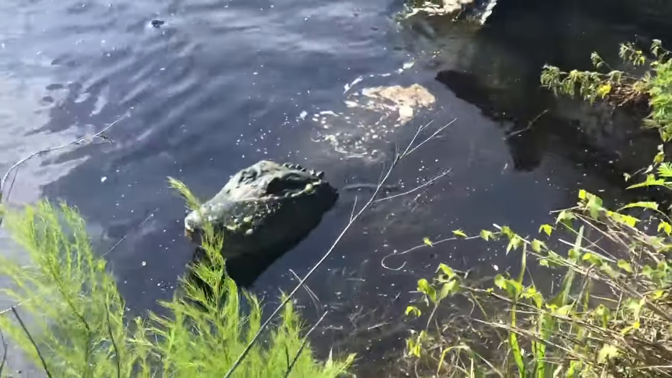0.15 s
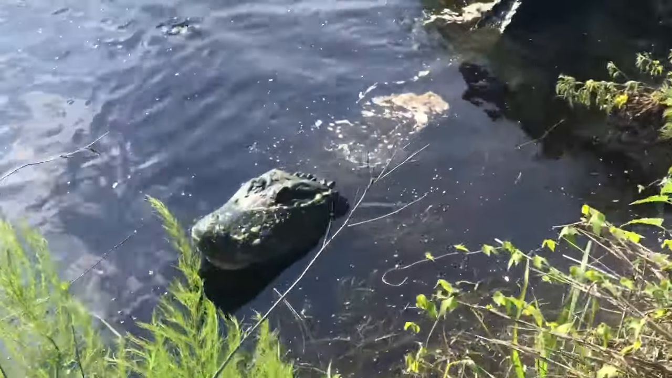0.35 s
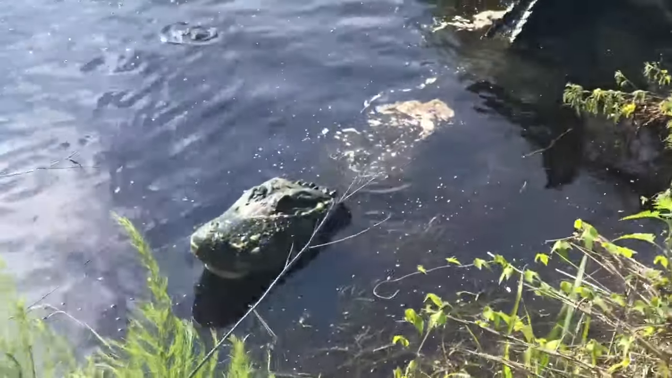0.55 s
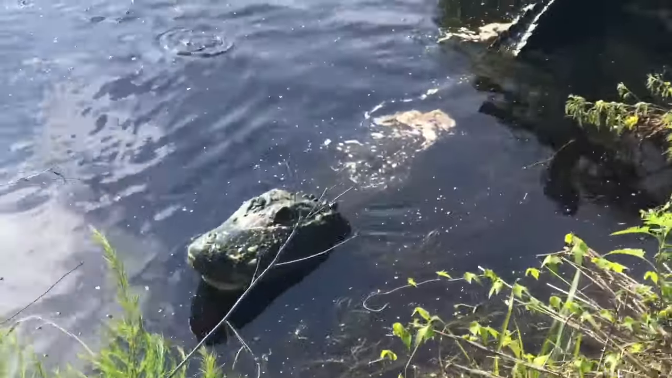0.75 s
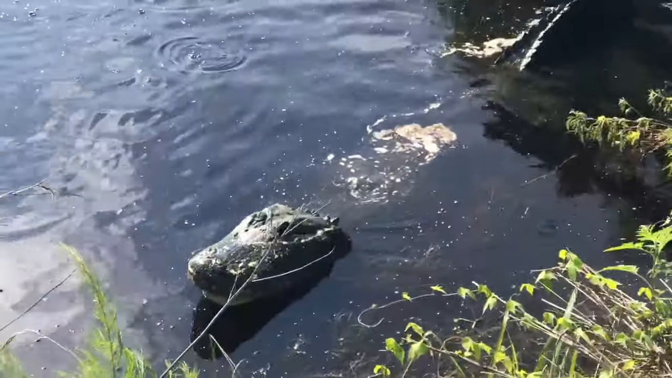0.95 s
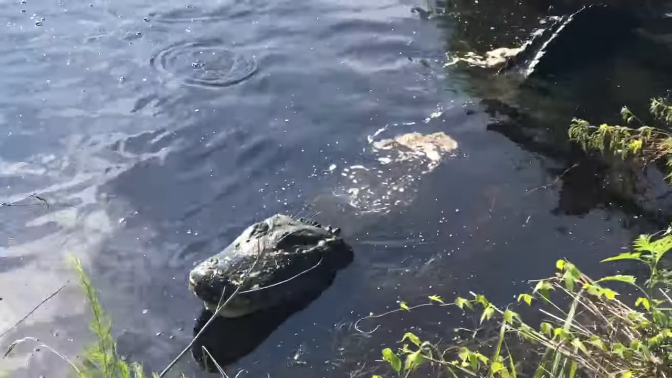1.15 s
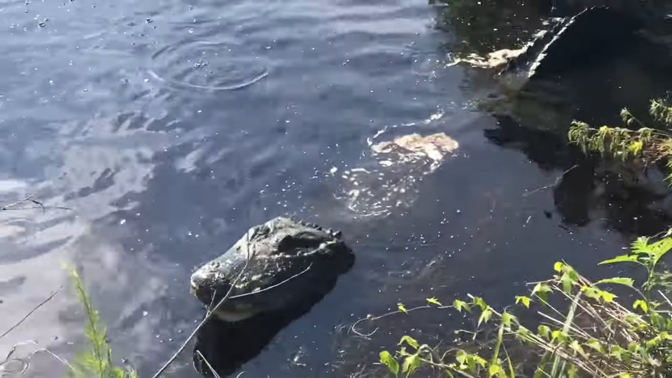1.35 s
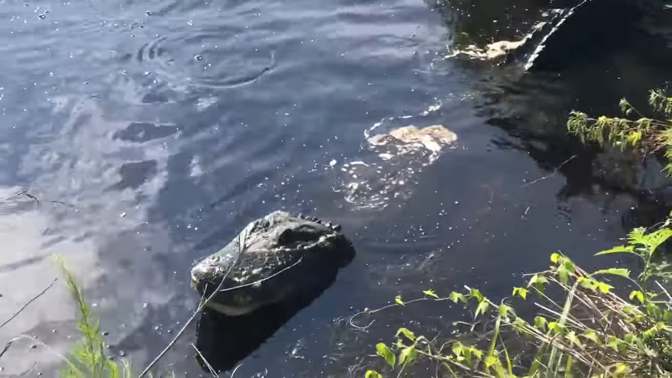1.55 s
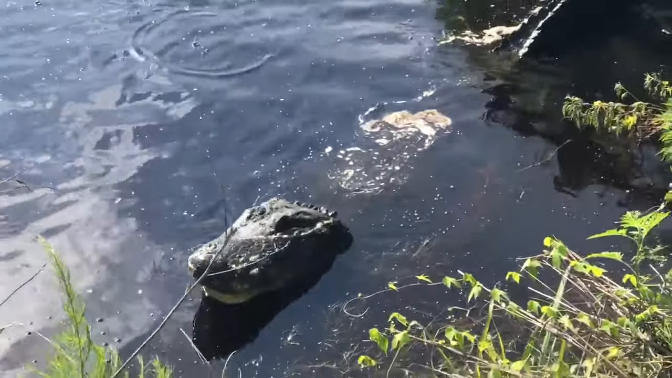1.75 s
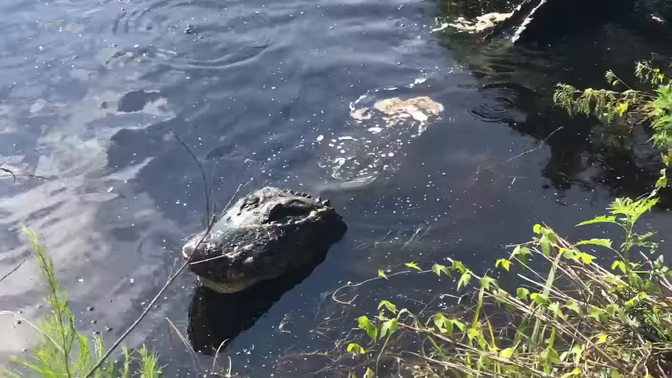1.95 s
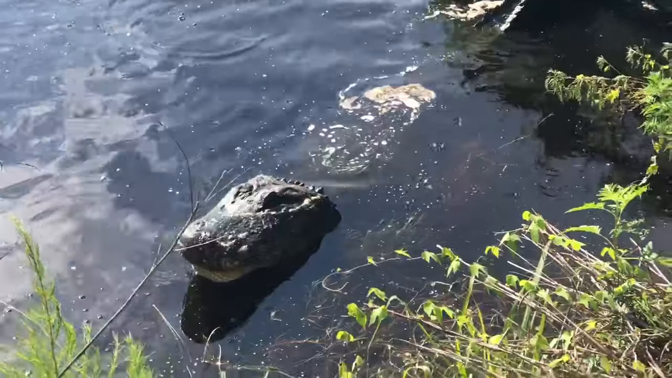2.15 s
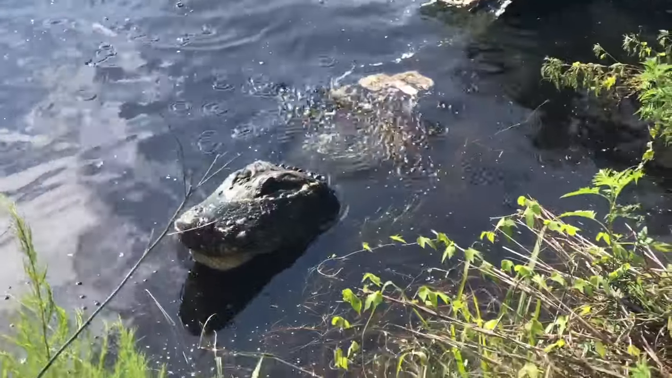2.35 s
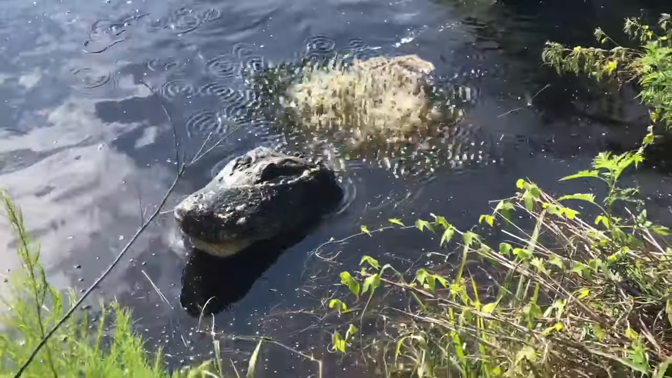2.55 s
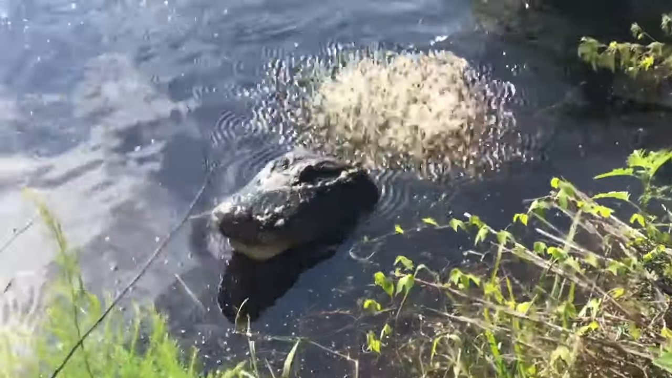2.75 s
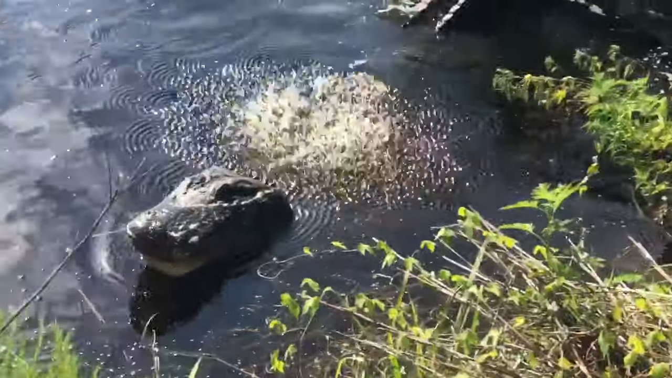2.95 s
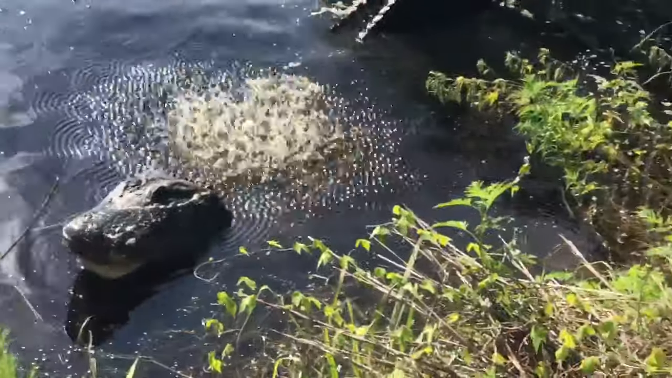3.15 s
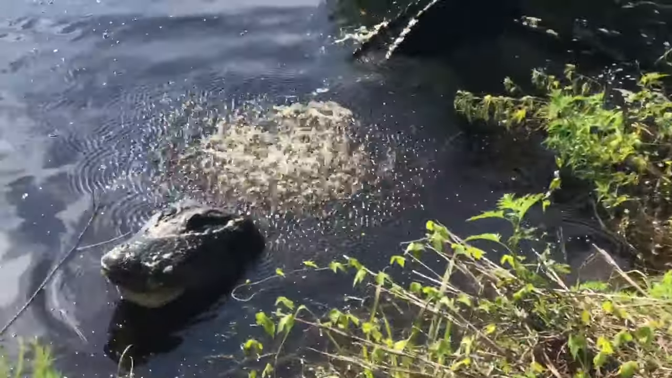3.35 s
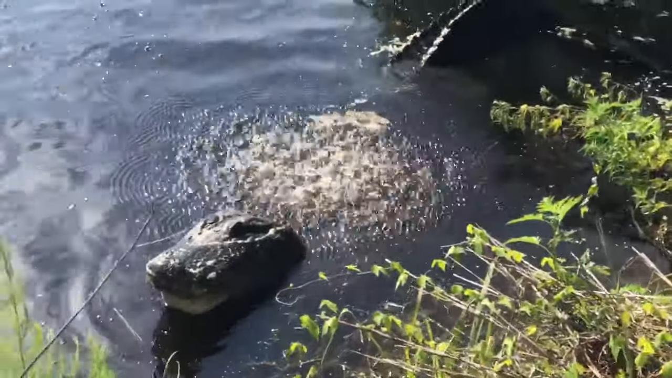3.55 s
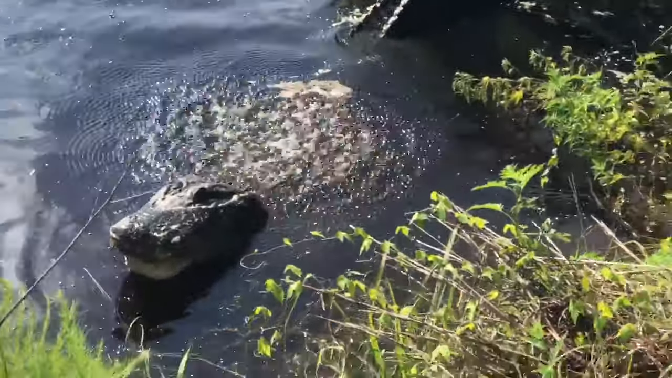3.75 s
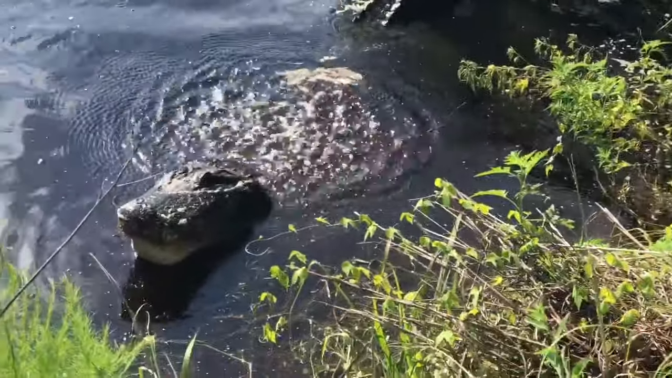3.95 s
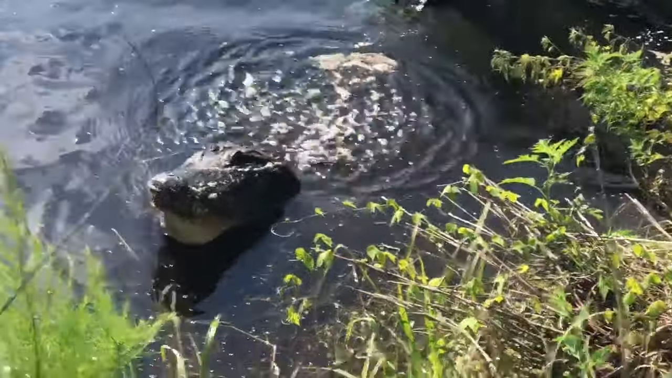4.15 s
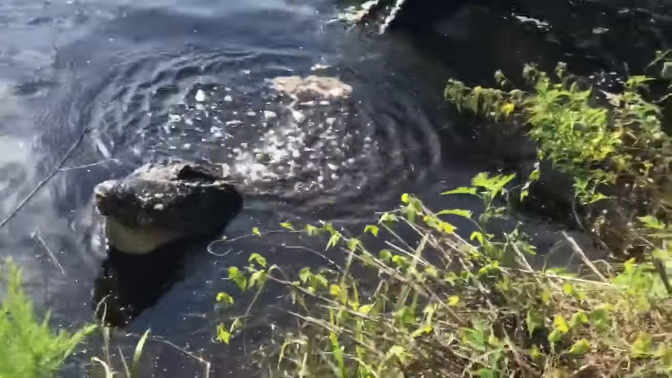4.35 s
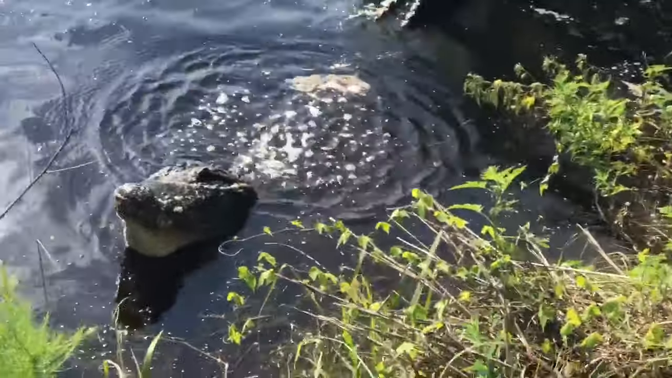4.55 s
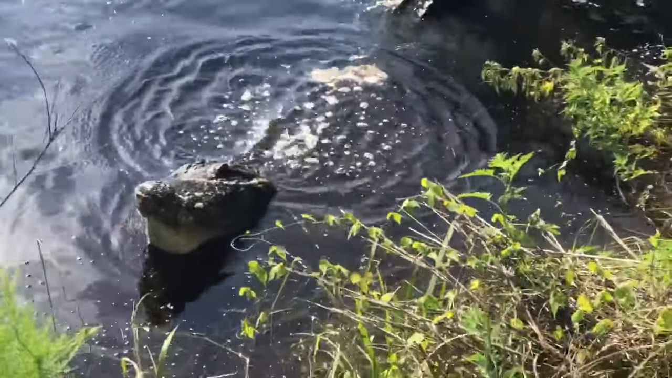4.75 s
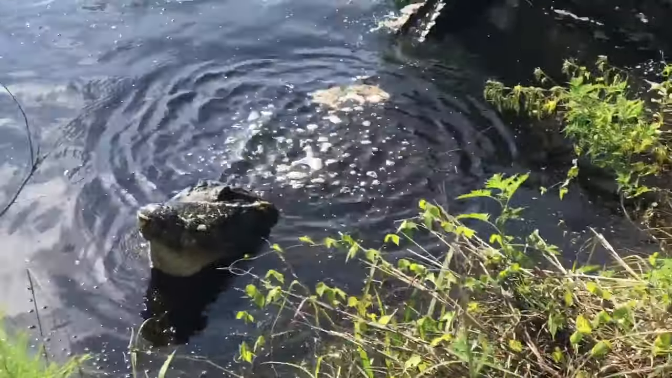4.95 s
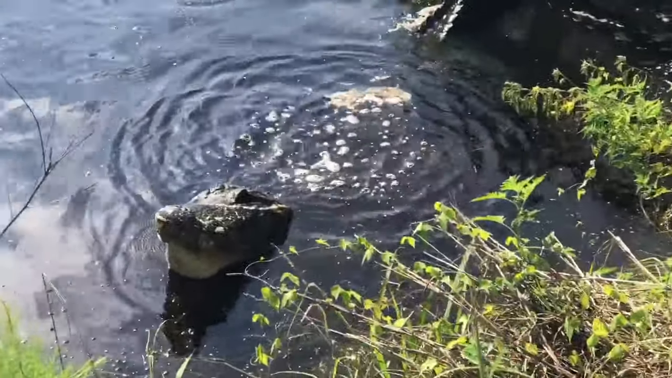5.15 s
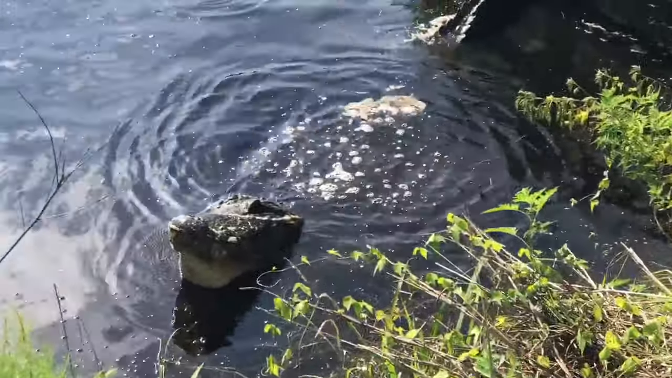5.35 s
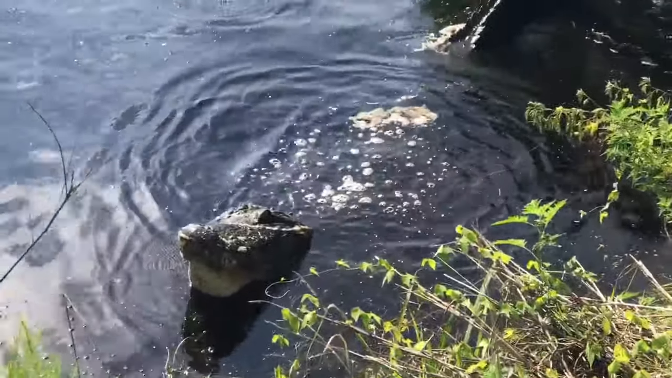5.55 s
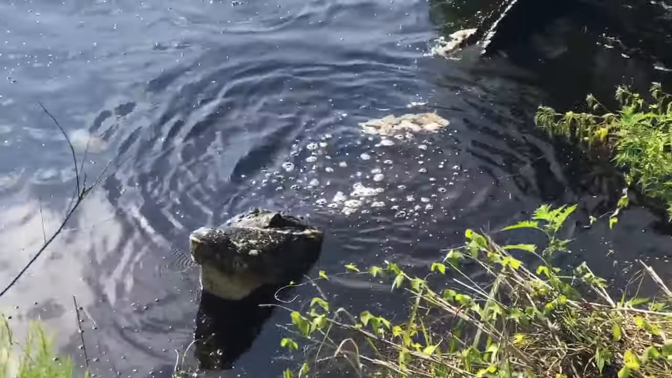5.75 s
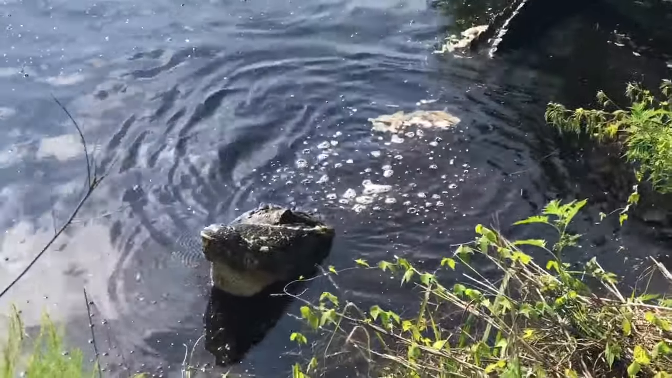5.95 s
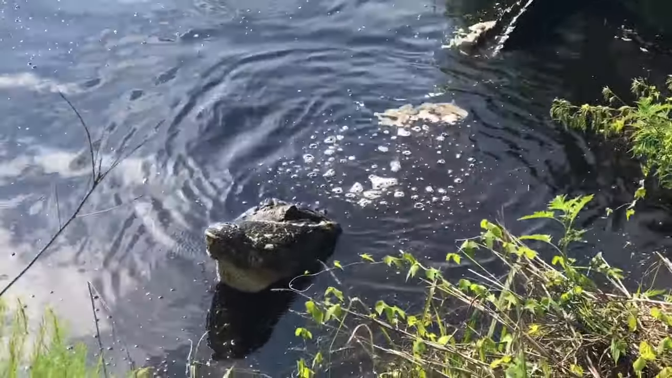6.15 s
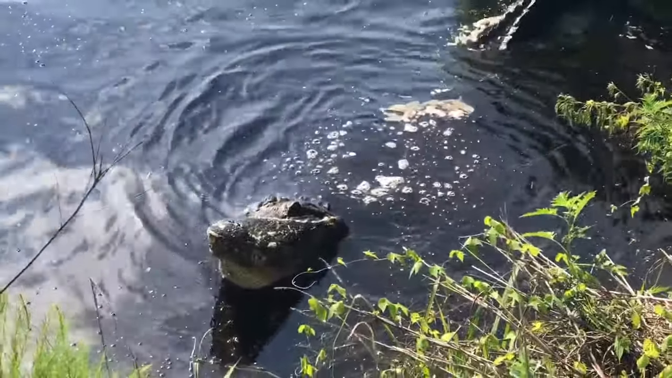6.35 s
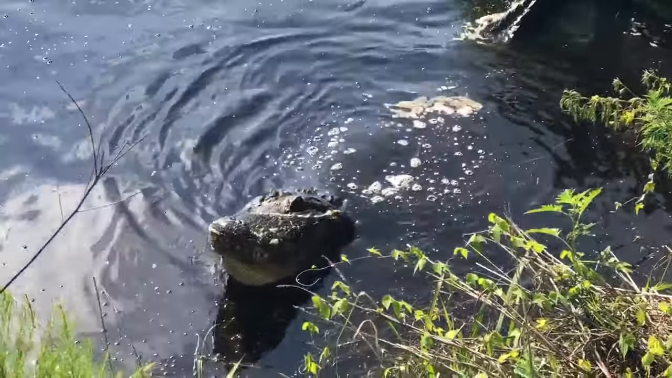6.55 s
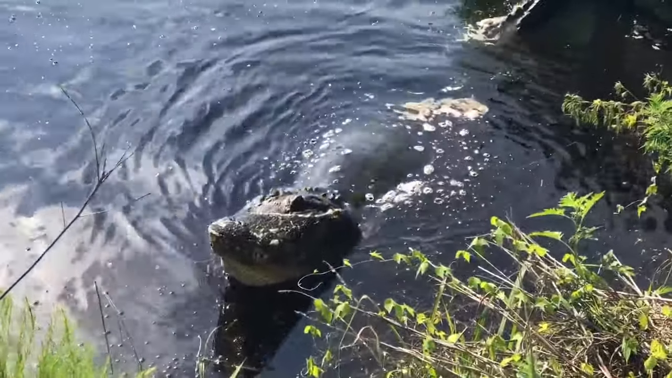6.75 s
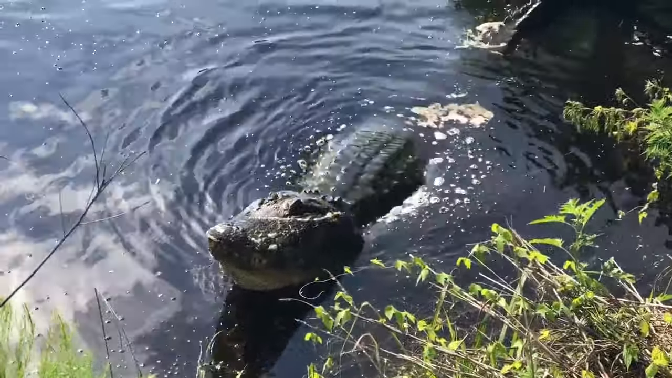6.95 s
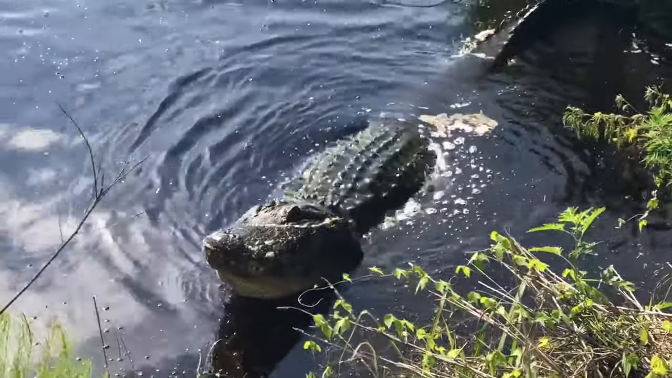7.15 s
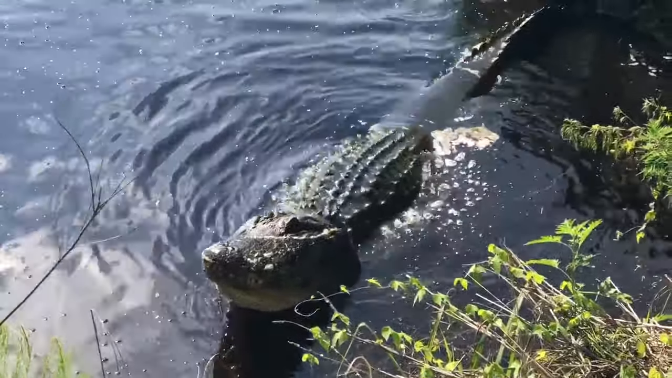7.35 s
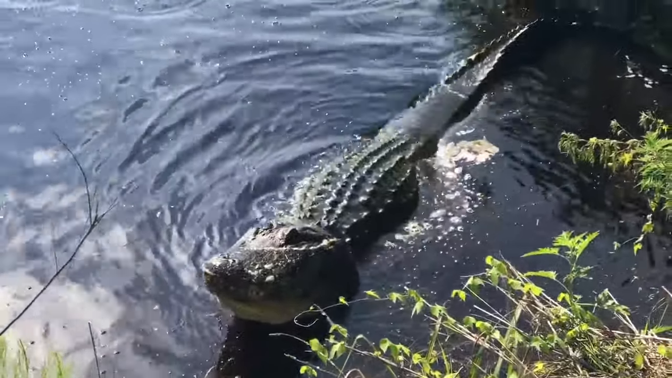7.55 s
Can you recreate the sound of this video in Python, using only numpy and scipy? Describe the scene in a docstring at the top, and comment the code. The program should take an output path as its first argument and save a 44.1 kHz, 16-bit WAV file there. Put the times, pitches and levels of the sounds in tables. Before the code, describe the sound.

Quiet pond lapping, then low flank throbs and pulsing spray, a short growl and a loud rumbling alligator bellow, ending in thumps and plops.

```python
"""Bellow of an alligator

An alligator lying in a pond bellows once, a few metres from the bank. Flank pulses near 20 Hz throw up spray;
a short growl leads into the bellow, a train of fold pulses filtered by the throat, with turbulent air in the snout.
The pulses slow down and end in single thumps. Decaying sines form bubbles and drops; filtered noise forms the
churning, lapping, breeze and leaves, and narrow chirping noise bands form the insects.
"""
import sys
import numpy as np
from scipy import signal
from scipy.fft import rfft, irfft
from scipy.io import wavfile
from scipy.ndimage import uniform_filter1d

SR = 44100
rng = np.random.default_rng(int(sys.argv[2]) if len(sys.argv) > 2 else 0)


def inscribe(sig):
    """Save sig as 16-bit PCM at rate SR to the path in sys.argv[1].

    A 1-D sig is mono; a 2-D sig holds one channel per row.
    Samples are clipped to [-1, 1] before scaling.
    """
    pcm = np.round(np.clip(np.atleast_2d(sig).T, -1, 1) * 32767)
    wavfile.write(sys.argv[1], SR, pcm.astype(np.int16))


N = 335160
TIME = np.arange(N) / SR

# Envelopes hold start [s], attack [s], end [s], release [s]; the release is the time of each 20 dB of decay.
# Levels in dB are gains on the part named; SAG is the loss while the sound is held.

# pulse rate of the bellowing folds: (time [s], rate [Hz])
BELLOW_RATE = [(4.015, 52.54), (4.2, 52.5), (4.4, 50.66), (4.6, 48.1), (4.8, 46.21), (5.0, 43.55),
               (5.15, 39.28), (5.3, 34.82), (5.45, 31.26), (5.6, 28.24), (5.85, 26.15), (6.04, 22.68)]
# bellow: one long push of the lungs
BELLOW_ENV = (4.005, 0.018, 5.96, 0.27)
RASP_ATTACK_S, RASP_RELEASE_S = 0.06, 0.82
PRESSURE_CURVE = 1.7  # the pressure holds at first and then falls ever faster
# each part of the bellow: its level at full pressure and its fall until the lungs are empty
PULSE_DB, PULSE_FALL_DB = -27.5, 3.5
FLUTTER_DB, FLUTTER_FALL_DB = -21.5, 16
RASP_DB, RASP_FALL_DB = -35.5, 21
AIR_DB, AIR_FALL_DB = -41, 19.5
LEAK_DB, LEAK_FALL_DB = -2, 16
FLUTTER_END_S, FLUTTER_RELEASE_S = 5.56, 0.45  # the slowest beats are nearly free of flutter
ONSET_DB, ONSET_S = 9.5, 0.028  # the folds burst open harder than they go on
SCATTER_FIRST_DB, SCATTER_LATE_DB = 1.5, 0.8  # chance in pulse strength, at first and from halfway on
# near one pulse rate the folds beat strong-weak
ALTERNATE_DB, ALTERNATE_HZ, ALTERNATE_WIDTH_HZ = 5, 44.5, 5
# the folds flap open a little before each closure: share of a cycle, level against the closure
OPENING_SHARE, OPENING_DB = 0.1, -6
# drone of the chest, harmonics 1 to 4: (start [s], attack [s], end [s], release [s], level [dB])
DRONE_HARMONICS = [(3.4, .02, 5.1, .33, -37.5), (4.015, .025, 4.59, 1.0, -26),
                   (4.34, 0.42, 5.13, 0.61, -23), (4.015, 0.018, 5.25, 0.27, -23.5)]
# spectrum of the open throat: (frequency [Hz], level [dB])
THROAT = [(25, -30), (45, -5.5), (70, -7.5), (100, -1.5), (170, 5.5), (230, -2), (300, -2), (340, -7.5),
          (380, -17), (415, -32.5), (480, -54), (800, -62.5)]
# spectrum of the tightened throat: (frequency [Hz], level [dB])
TIGHT_THROAT = [(20, -24), (40, -7), (60, -2.5), (100, -1.5), (200, -3), (245, 2.5), (290, -17), (350, -27),
                (410, -46), (800, -51.5)]
# spectrum of rushing air: (frequency [Hz], level [dB])
AIR = [(300, 0), (500, 7), (700, 3), (1800, -1.5), (3000, 2.5), (4200, 1.5), (6000, 0), (9000, -1),
       (12000, -4.5), (15500, -14)]
# steady resonances of the snout: (centre [Hz], width [Hz], level [dB])
SNOUT_MODES = [(1364, 59, 2.5), (1688, 71, -8.5), (1960, 33, -6.5), (2195, 11, 1), (2400, 50, -1.5),
               (2837, 85, -7), (3006, 42, -4), (3547, 28, -2.5), (4140, 420, -10.5)]
# throat resonances that glide as the lungs empty:
# (first centre [Hz], last centre [Hz], width [Hz], first level [dB], last level [dB])
GLIDING_MODES = [(868, 955, 26, 7.5, -4), (928, 1240, 35, -7.5, 12.5)]
# resonances that ring with the spitting of the slow beats: (centre [Hz], width [Hz], level [dB])
SPIT_MODES = [(1162, 120, 1), (1375, 58, -2), (2420, 34, 4), (3620, 150, -0.5), (4290, 620, -3)]
SPIT_ENV, SPIT_DB = (4.91, 0.49, 5.294, 0.72), -44.5

# last single thumps: (time [s], peak level [dB])
THUMPS = [(6.07, -19.5), (6.12, -28.5), (6.179, -27.5), (6.302, -43)]
THUMP_PUFF_DB = -32.5  # air that escapes with each thump, against the thump's pulse

# pulse rate of the opening growl: (time [s], rate [Hz])
GROWL_RATE = [(3.707, 34.75), (3.78, 33.52), (3.86, 31.89), (4.01, 31.23)]
GROWL_ENV = (3.646, 0.15, 3.98, 0.027)
GROWL_DB, GROWL_SAG_DB_PER_S, GROWL_FLUTTER_DB = -28.5, 41, -40.5

# resonances of the nostrils: (centre [Hz], width [Hz], level [dB])
NOSE_MODES = [(1130, 160, -14), (1415, 110, -26), (2000, 39, -0.5), (2558, 7.5, 10), (2830, 21, 6.5),
              (3150, 18, 4.5), (3390, 32, -1), (3740, 65, -2), (4130, 30, 2.5), (4310, 61, 2),
              (4720, 94, 0.5), (5330, 21, -1)]
# squeezes of air through the nostrils: (start [s], attack [s], end [s], release [s], level [dB])
SQUEEZES = [(3.03, 0.14, 3.48, 0.29, -59.5), (3.62, 0.15, 3.87, 0.18, -47)]

# beat rate of the shuddering flanks: (time [s], rate [Hz])
TREMOR_RATE = [(2.302, 17.33), (2.55, 17.3), (2.8, 19.25), (3.05, 20.7), (3.25, 22.37), (3.5, 22.88),
               (3.9, 25.84)]
# spectrum of the flanks pumping the water: (frequency [Hz], level [dB])
FLANKS = [(18, -29), (33, -5), (45, 6.5), (62, 5), (82, -19.5), (135, -5.5), (200, -43), (400, -62)]
# shudder of the flanks, with a knock in the throat at first
SHUDDER_ENV, KNOCK_ENV = (2.14, 0.69, 3.78, 0.17), (2.28, 0.03, 2.85, 0.09)
SHUDDER_DB, SHUDDER_SAG_DB_PER_S, KNOCK_DB = -40, 4.5, -49

# the water leaps over the back, then settles
DANCE_ENV = (2.521, 0.18, 3.76, 0.21)
DANCE_PLOPS_DB, PLOPS_SAG_DB_PER_S = -43.5, 31
DROPS_DB, MIST_DB, SPRAY_SAG_DB_PER_S = -47.5, -44.5, 18.5
# spectrum of spray: (frequency [Hz], level [dB])
SPRAY = [(290, -46), (500, -19), (657, -10), (997, -8), (1200, -3.5), (2540, -13.5), (3150, -8.5),
         (7670, -15.5), (8720, -16), (15500, -21)]
# spectrum of churning water: (frequency [Hz], level [dB])
CHURNING = [(25, -48), (70, -20), (130, 1), (180, -3.5), (230, -2.5), (275, -5.5), (320, -37), (450, -38)]
# water churning round the body: (start [s], attack [s], end [s], release [s], level [dB])
CHURNS = [(2.25, 0.068, 3.18, .2, -55), (3.1, 0.54, 5.6, .1, -49.5), (3.9, .12, 5.42, 0.89, -41),
          (6.4, 1, 8.04, .1, -54)]

# bubbles and plops: (time [s], peak level of the main bubble [dB], frequency [Hz])
PLOPS = [(0.522, -49, 1190), (1.995, -55, 610), (2.432, -43.5, 920), (2.469, -36.5, 1560),
         (2.552, -44.5, 680), (3.251, -45, 660), (3.371, -39.5, 750), (6.137, -47.5, 1900),
         (6.209, -47, 1340), (6.413, -44.5, 1410), (6.645, -49, 834), (6.936, -43.5, 1610),
         (7.085, -43, 1120), (7.135, -42, 860), (7.197, -47, 1200), (7.231, -45.5, 1550),
         (7.303, -43.5, 694), (7.505, -46, 2200)]
# sharp ticks of falling drops: (time [s], peak level [dB])
TICKS = [(0.523, -37), (1.036, -35.5), (2.896, -41), (3.368, -32), (7.087, -41)]
TICK_T60_S = 0.028

# steady surroundings; the lapping grows once the animal stirs
BREEZE_DB, LAP_DB, LEAVES_DB = -56.5, -64, -68
STIR_S, STIR_RISE_S, STIR_DB = 1.75, 0.14, 3.5
RIPPLES_DB = -2  # tiny bubbles against the wash of the lapping
WASH_WANDER_DB = 2.5
# spectrum of lapping water: (frequency [Hz], level [dB])
POND = [(210, -15), (350, 0), (837, -0.5), (997, 0), (1150, 1.5), (2670, -8), (3070, -5.5), (5030, -13),
        (9480, -20), (10400, -44), (12800, -22), (15500, -47)]
# wavelets reaching the bank: (time [s], length [s], level [dB])
WAVELETS = [(0.226, 0.073, -60), (0.958, 0.24, -64.5), (2.008, 0.051, -64), (4.006, 0.18, -53.5),
            (6.67, 0.099, -59), (7.174, 0.15, -56)]
# spectrum of the breeze: (frequency [Hz], level [dB])
BREEZE = [(12, -36), (22, -19), (41, -3), (65, 3.5), (103, -3), (136, -3), (282, -17.5), (308, -19.5),
          (338, -23.5), (450, -29), (580, -32), (990, -120)]
# gusts on the microphone: (time [s], length [s], level [dB])
GUSTS = [(.23, 0.1, -51), (0.477, 0.07, -50.5), (0.704, 0.026, -53), (0.867, 0.083, -47.5),
         (1.053, 0.078, -60), (1.655, 0.065, -52), (2.05, 0.018, -54)]
# spectrum of the leaves: (frequency [Hz], level [dB])
LEAVES = [(1500, -12), (4000, -0.5), (9000, 5), (11000, 4), (13000, 7), (15500, 1.5)]
# rustles of the leaves: (time [s], length [s], level [dB])
RUSTLES = [(0.215, 0.091, -59), (6.452, 0.078, -60), (6.61, 0.16, -62), (7.189, 0.31, -66)]
# insects in the reeds: (centre [Hz], width [Hz], mean chirp rate [1/s], level [dB])
INSECTS = [(9200, 350, 4.5, -85.5), (8450, 290, 3, -80.5)]

# treble response of the microphone: (frequency [Hz], level [dB])
MICROPHONE = [(4400, 0.5), (4900, -1), (5400, 2), (6800, 2.5), (7500, -0.5), (8400, 0.5), (9600, 1.5),
              (10500, -3), (11800, -0.5)]
TOP_HZ = 15750


def bellow():
    """Source and filter: the folds beat through the throat and slacken with the falling pressure."""
    hz, = curves(BELLOW_RATE)
    spent = air_spent()
    slack = spent ** PRESSURE_CURVE
    scatter_db = np.interp(spent, [0, 0.5], [SCATTER_FIRST_DB, SCATTER_LATE_DB])
    alternate_db = ALTERNATE_DB * np.exp(-((hz - ALTERNATE_HZ) / ALTERNATE_WIDTH_HZ) ** 2)
    pulses, turns = beats(BELLOW_RATE, scatter_db, alternate_db)

    onset_db = ONSET_DB * np.exp(-np.maximum(TIME - BELLOW_RATE[0][0], 0) / ONSET_S)
    strength = envelope(*BELLOW_ENV) * undb(PULSE_DB + onset_db - PULSE_FALL_DB * slack)
    voice = body((pulses + openings(pulses, hz)) * strength, THROAT, lean=1.26)

    flutter_gain = envelope(*BELLOW_ENV[:2], FLUTTER_END_S, FLUTTER_RELEASE_S)
    chaos = flutter() * flutter_gain * undb(FLUTTER_DB - FLUTTER_FALL_DB * spent)
    return voice + chaos + drone(turns) * during(BELLOW_RATE) + airflow(pulses, slack)


def air_spent():
    """Emptying of a reservoir: share of the lungs' air that the bellow has used, 0 to 1."""
    return np.interp(TIME, [BELLOW_RATE[0][0], BELLOW_RATE[-1][0]], [0, 1])


def openings(pulses, hz):
    """Double excitation per cycle: a weaker pulse ahead of each closure."""
    at = np.flatnonzero(pulses)
    early = np.zeros(N)
    early[at - (OPENING_SHARE * SR / hz[at]).astype(int)] = pulses[at] * undb(OPENING_DB)
    return early


def flutter():
    """Irregular vibration of the folds: chaotic in timing but fairly even in strength; rms 1."""
    chaos = signal.hilbert(colour(noise(), TIGHT_THROAT))
    even = np.cos(np.angle(chaos))
    return unit(colour(even, THROAT))


def drone(turns):
    """Harmonic series: the chest hums along on four harmonics; the third comes in as the pitch sinks."""
    hum = np.zeros(N)
    for k, (*shape, db) in enumerate(DRONE_HARMONICS, 1):
        gain = envelope(*shape) * undb(db + 0.6 * walk(22))
        hum -= gain * np.cos(2 * np.pi * k * turns + 0.4)
    return np.sqrt(2) * hum


def airflow(pulses, slack):
    """Modulated turbulence: air rushes on each beat, resonances ring between, slow beats spit brightly."""
    start, _, end, _ = BELLOW_ENV
    span = during(BELLOW_RATE)
    gate = puffs(pulses, 0.021, LEAK_DB - LEAK_FALL_DB * slack) * span
    air = unit(colour(noise(), AIR)) * gate * undb(AIR_DB - AIR_FALL_DB * slack)
    ringing = rasp() * (0.47 * gate + 0.4 * span) * undb(RASP_DB - RASP_FALL_DB * slack)

    spit = unit(sum(undb(db) * resonance(hz, width) for hz, width, db in SPIT_MODES))
    spit_gain = puffs(pulses, 0.033, -9) * span * envelope(*SPIT_ENV) * undb(SPIT_DB)
    return (air + ringing) * envelope(start, RASP_ATTACK_S, end, RASP_RELEASE_S) + spit * spit_gain


def rasp():
    """Turbulence exciting throat and snout: two resonances glide up, and each flickers on its own."""
    spent = air_spent()
    modes = list(SNOUT_MODES)
    for first_hz, last_hz, width, first_db, last_db in GLIDING_MODES:
        hz = first_hz + (last_hz - first_hz) * spent
        db = first_db + (last_db - first_db) * spent
        modes.append((hz, width, db))
    flicker_db = 1.3
    return unit(sum(undb(db + flicker_db * walk(30)) * resonance(hz, width) for hz, width, db in modes))


def thumps():
    """Single impulse responses: the folds flap as the air runs out, each time with a small puff."""
    pulses = np.zeros(N)
    for s, db in THUMPS:
        pulses[int(s * SR)] = undb(db)
    sound = body(pulses, THROAT, lean=2.1)
    air = unit(resonance(1368, 150)) + 0.64 * unit(colour(noise(), AIR))
    gate = signal.fftconvolve(pulses, np.hanning(int(0.035 * SR)), "same")
    puff = air * gate * undb(THUMP_PUFF_DB)
    return sound * pulses.max() / abs(sound).max() + puff


def growl(pulses):
    """Source and filter: beats through the tight throat swell and sag over a light flutter."""
    effort = envelope(*GROWL_ENV, GROWL_SAG_DB_PER_S) * undb(GROWL_DB)
    light_flutter = flutter() * during(GROWL_RATE) * undb(GROWL_FLUTTER_DB)
    return body(pulses * effort, TIGHT_THROAT, lean=0.22) + light_flutter


def nostrils(turns, growl_pulses):
    """Turbulence in a constriction: air whistles faintly after each shudder, then on each growl beat."""
    hiss = unit(sum(undb(db + 1.3 * walk(10)) * resonance(hz, width) for hz, width, db in NOSE_MODES))
    squeeze = 0.29 + 3.6 * np.exp(-((turns - 0.22) % 1) / 0.6)
    gate = np.where(TIME < GROWL_RATE[0][0], squeeze, puffs(growl_pulses, 0.013, -6.5))
    air = undb(-10.5) * unit(colour(noise(), AIR))
    return (hiss + air) * gate * pushes(SQUEEZES)


def shudder(pulses):
    """Radiation from a pulsating body: the flanks pump the water; early on the throat knocks along."""
    flank_gain = envelope(*SHUDDER_ENV, SHUDDER_SAG_DB_PER_S) * undb(SHUDDER_DB)
    knock_gain = envelope(*KNOCK_ENV) * undb(KNOCK_DB)
    return body(pulses, FLANKS, lean=0.83) * flank_gain + body(pulses, THROAT, lean=0.22) * knock_gain


def water_dance(turns):
    """Periodic ejection: spray leaps after each flank beat, drops fall ever more evenly, water churns."""
    span = during(TREMOR_RATE)
    age = (turns - 0.22) % 1  # in cycles
    spurt = (1 - np.exp(-age / 0.035)) * np.exp(-age / 0.26)
    evenness = np.interp(TIME, [2.7, 3.4], [0.04, 0.2])
    gate = unit(spurt + evenness) * span
    gate = gate / np.sqrt(np.mean(gate[gate > 0] ** 2))

    bubbling = patter(gate + 0.6 * span, 626, 2220, 29, 7.0, count=1100) * undb(DANCE_PLOPS_DB)
    drops = patter(gate ** 2, 1960, 14400, 25, 4.8, count=2000) * undb(DROPS_DB)
    mist = unit(colour(noise(), SPRAY)) * gate * undb(MIST_DB)
    churn = unit(colour(noise(), CHURNING)) * pushes(CHURNS)
    leaping = (drops + mist) * envelope(*DANCE_ENV, SPRAY_SAG_DB_PER_S)
    return bubbling * envelope(*DANCE_ENV, PLOPS_SAG_DB_PER_S) + leaping + churn


def plops():
    """Bubble resonance: each plop is one main bubble and a brief splash of smaller ones."""
    s, db, hz = np.transpose(PLOPS)
    delay, pitch, size = rng.random((len(s), 3, 9)).transpose(1, 0, 2)
    times = s[:, None] + 0.03 * delay ** 2
    sizes = undb(db - 5)[:, None] * size
    small = bubbles(times.ravel(), sizes.ravel(), (900 * 6 ** pitch).ravel(), 26)
    return bubbles(s, undb(db), hz, 24) + small


def ticks():
    """Impact noise: single drops strike the water with a brief, decaying burst of spray."""
    bursts = sum(undb(db - 60 * np.maximum(TIME - s, 0) / TICK_T60_S) * (TIME >= s) for s, db in TICKS)
    spray = colour(noise(), SPRAY)
    return bursts * spray / abs(spray).max()


def bank(x, t60=0.1, wet_db=-13):
    """Diffuse scattering: the near bank and the reeds send back a short noise tail."""
    age = TIME[:SR // 2]
    tail = rng.standard_normal(len(age)) * undb(-60 * age / t60) * (age > 0.008)
    return x + undb(wet_db) * signal.fftconvolve(x, tail / np.linalg.norm(tail))[:N]


def pond():
    """Broadband ambient noise: breeze on the microphone, lapping ripples, and leaves on the bank."""
    breeze = unit(colour(noise(), BREEZE) * undb(2.0 * walk(14))) * swells(BREEZE_DB, GUSTS)
    wash = unit(colour(noise(), POND) * undb(WASH_WANDER_DB * walk(13)))
    ripples = patter(np.ones(N), 578, 5620, 24, 2.4, count=2400) * undb(RIPPLES_DB)
    stirred = np.clip((TIME - STIR_S) / STIR_RISE_S, 0, 1)
    lapping = swells(LAP_DB + STIR_DB * stirred, WAVELETS)
    leaves = unit(colour(noise() * undb(3.1 * walk(200)), LEAVES)) * swells(LEAVES_DB, RUSTLES)
    return breeze + (wash + ripples) * lapping + leaves


def insects():
    """Amplitude modulation: narrow noise bands pulse as faint, thin chirps from the reeds."""
    chorus = np.zeros(N)
    for hz, width, rate, db in INSECTS:
        chirp = np.sin(np.pi * rate * TIME + 0.5 * walk(1.8)) ** 4
        chorus += unit(resonance(hz, width) * chirp) * undb(db)
    return chorus


def beats(table, scatter_db, alternate_db=0):
    """Pulse train: a moving rate at even mean power, with the count of cycles from its start."""
    hz, = curves(table)
    turns = np.cumsum(hz * (TIME > table[0][0])) / SR - 0.5
    new_cycle = np.diff(np.floor(turns)) > 0
    at = np.flatnonzero(new_cycle & (TIME[1:] < table[-1][0]))
    chance_db = (scatter_db + 0 * TIME)[at] * rng.standard_normal(len(at))
    strong_weak_db = (alternate_db + 0 * TIME)[at] * (-1) ** np.arange(len(at))
    pulses = np.zeros(N)
    pulses[at] = undb(chance_db - strong_weak_db) * np.sqrt(SR / hz[at])
    return pulses, turns


def body(pulses, points, lean=0.7):
    """Cavity response: each pulse is a soft suck and push, phase turned by lean [rad]; power is kept."""
    click = np.zeros(N)
    click[N // 2] = 1
    gain = np.sqrt(np.sum(colour(click, points) ** 2))
    return -(signal.hilbert(colour(pulses, points)) * np.exp(1j * lean)).real / gain


def puffs(pulses, length, leak_db):
    """Flow modulation: a puff round each pulse and a leak between; local mean power near 1."""
    window = np.hanning(int(length * SR))
    gate = signal.fftconvolve(1.0 * (pulses > 0), window, "same") + undb(leak_db)
    return gate / np.sqrt(uniform_filter1d(gate ** 2, size=6000))


def resonance(hz, width):
    """Turbulence in a resonator: low-passed complex noise shifted to a centre that may move."""
    swell = noise() + 1j * noise()
    for cutoff in (width / 2, width * 2):
        swell = signal.sosfilt(signal.butter(1, cutoff, fs=SR, output="sos"), swell)
    return (swell * np.exp(2j * np.pi * np.cumsum(hz + 0 * TIME) / SR)).real


def bubbles(times, sizes, hz, cycles, glide=0.024, size=900):
    """Bubble resonance: each small bubble rings for a few cycles and rises in pitch."""
    age = np.arange(size) / SR
    life = age * (hz / cycles)[:, None]
    phase = 2 * np.pi * hz[:, None] * age * (1 + glide * np.minimum(life, 2) / 2)
    rings = np.sin(phase) * np.exp(-np.pi * life)
    faded = sizes[:, None] * rings * (1 - age / age[-1])
    at = (times * SR).astype(int)[:, None] + np.arange(size)
    return np.bincount(at.ravel(), faded.ravel(), N)[:N]


def patter(likelihood, low_hz, high_hz, cycles, spread_db, count):
    """Random superposition: bubbles crowd where the likelihood is high; rms 1 while they last."""
    when, pitch, size, ring = rng.random((count, 4)).T
    times = np.interp(when, np.cumsum(likelihood) / np.sum(likelihood), TIME)
    hz = low_hz * (min(high_hz, SR / 3) / low_hz) ** pitch
    sizes = undb(-spread_db * np.log(0.039 + size))
    return unit(bubbles(times, sizes, hz, cycles * (0.5 + ring))) * np.sqrt(np.mean(likelihood > 0))


def envelope(start, attack, end, release, sag_db_per_s=0):
    """Exponential decay: gain rises over the attack, sags, then loses 20 dB more per release time."""
    age = TIME - start
    fall_db = sag_db_per_s * np.maximum(age - attack, 0) + 20 * np.maximum(TIME - end, 0) / release
    return np.clip(age / attack, 0, 1) * undb(-fall_db)


def pushes(table):
    """Superposition: gain of a series of envelopes, each with its own level."""
    return sum(envelope(*shape) * undb(db) for *shape, db in table)


def swells(steady_db, table):
    """Addition of power: gain of a steady level with bell-shaped swells on top."""
    power = undb(steady_db) ** 2
    for s, length, db in table:
        power = power + undb(db) ** 2 * np.exp(-(2 * (TIME - s) / length) ** 2)
    return np.sqrt(power)


def during(table, fade=0.022):
    """Gating: one over the span of a table, fading outside it."""
    start, end = table[0][0], table[-1][0]
    return np.interp(TIME, [start - fade, start, end, end + fade], [0, 1, 1, 0])


def curves(table):
    """Linear interpolation: each column of a table after the time, as a value per sample."""
    s, *columns = np.transpose(table)
    return [np.interp(TIME, s, c) for c in columns]


def colour(x, points):
    """Linear filtering: shape a spectrum by points of (frequency [Hz], level [dB])."""
    hz, db = np.transpose(points)
    f = np.maximum(np.arange(N // 2 + 1) * SR / N, 1)
    return irfft(rfft(x) * undb(np.interp(np.log(f), np.log(hz), db)), N)


def noise():
    """White noise: equal mean power at all frequencies."""
    return rng.standard_normal(N)


def walk(rate):
    """Slow random fluctuation: chance values at a rate [1/s], joined by lines, spread near 1."""
    knots = rng.standard_normal(2048)
    return np.interp(TIME * rate, np.arange(len(knots)), knots)


def undb(db):
    """Logarithmic level: decibels to gain."""
    return 10 ** (np.asarray(db) / 20)


def unit(x):
    """Normalisation of power: scale to rms 1."""
    return x / np.sqrt(np.mean(x ** 2) + 1e-20)


def scene():
    """Superposition of sources: shudder, growl, bellow and last thumps over the pond."""
    tremor, turns = beats(TREMOR_RATE, 1.9)
    growl_pulses, _ = beats(GROWL_RATE, 0.93)
    call = bellow() + thumps() + growl(growl_pulses) + nostrils(turns, growl_pulses) + shudder(tremor)
    water = water_dance(turns) + plops() + ticks()
    return (bank(call + water) + pond() + insects())[None]


def record(dry):
    """Frequency response: the microphone's port notches the treble; the top is cut."""
    sound = colour(dry[0], MICROPHONE)
    return signal.sosfilt(signal.ellip(10, 0.2, 80, TOP_HZ, fs=SR, output="sos"), sound)[None]


dry = scene()
out = record(dry)
inscribe(out)
```